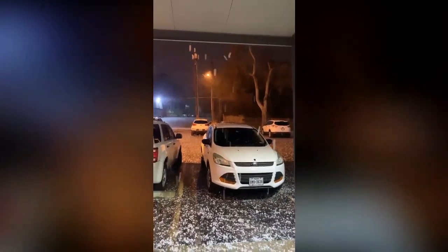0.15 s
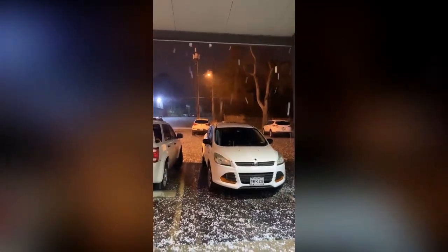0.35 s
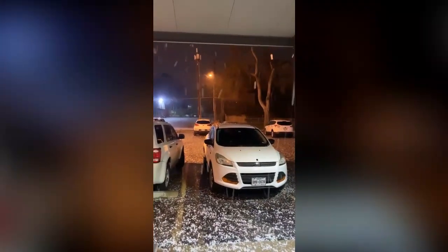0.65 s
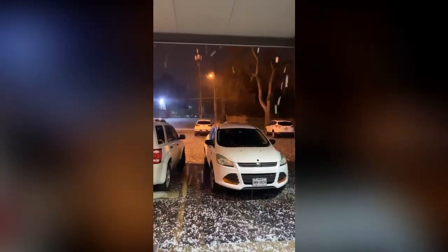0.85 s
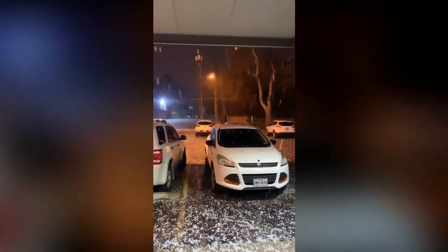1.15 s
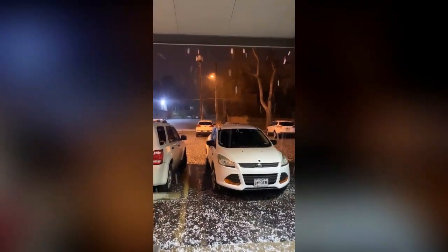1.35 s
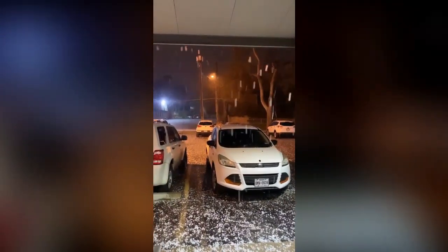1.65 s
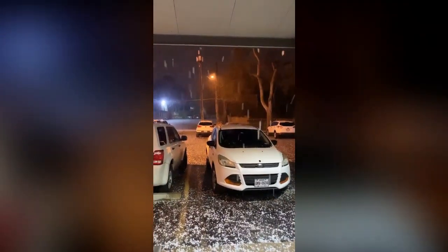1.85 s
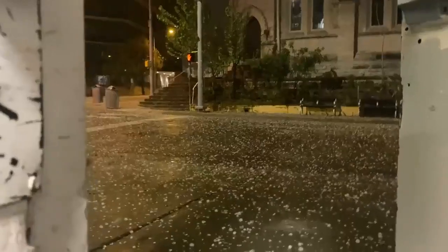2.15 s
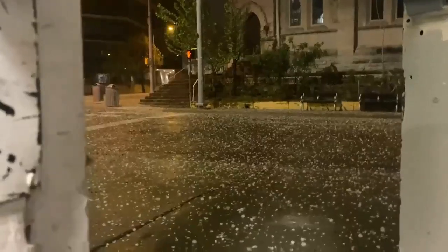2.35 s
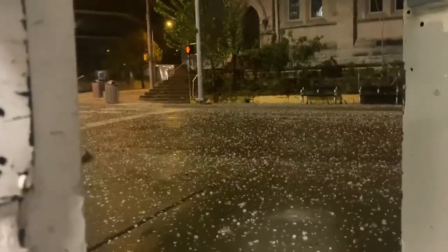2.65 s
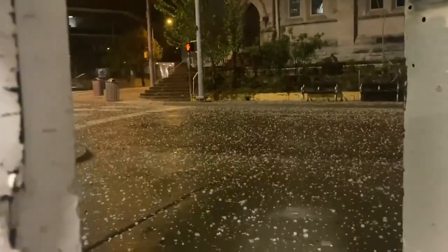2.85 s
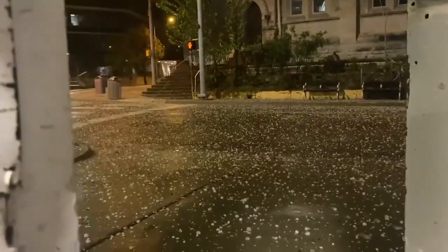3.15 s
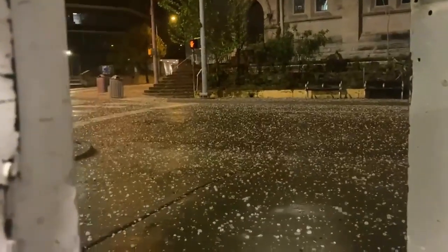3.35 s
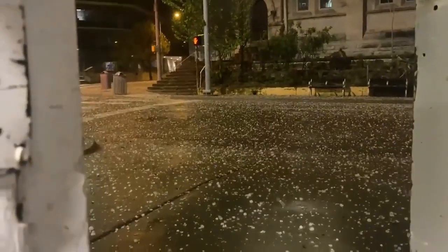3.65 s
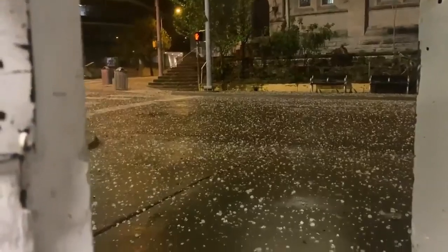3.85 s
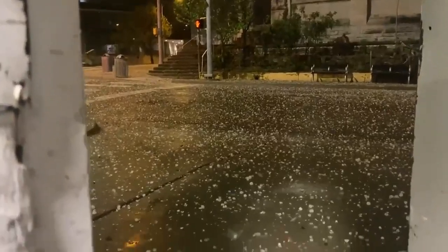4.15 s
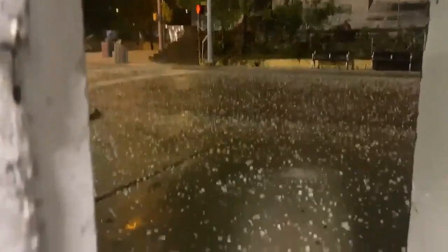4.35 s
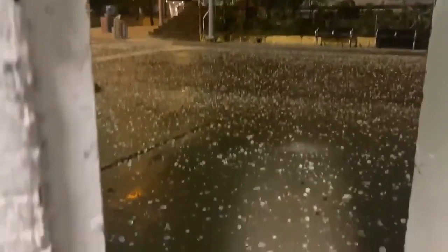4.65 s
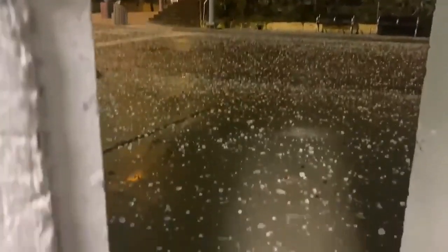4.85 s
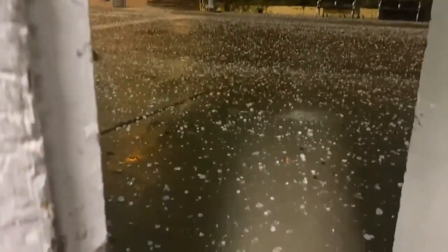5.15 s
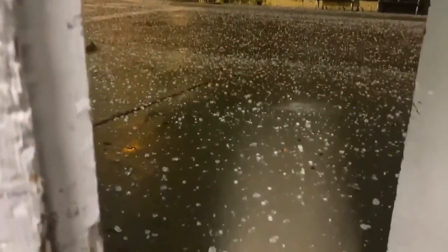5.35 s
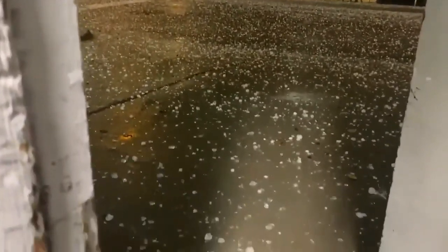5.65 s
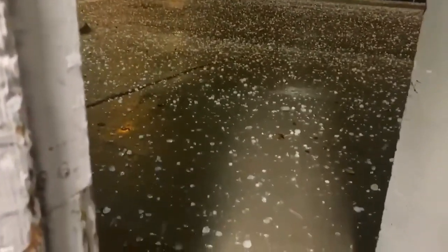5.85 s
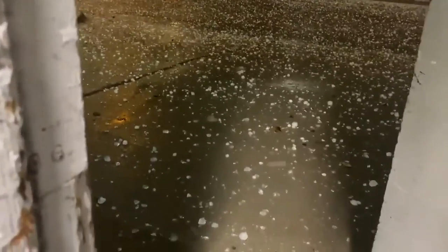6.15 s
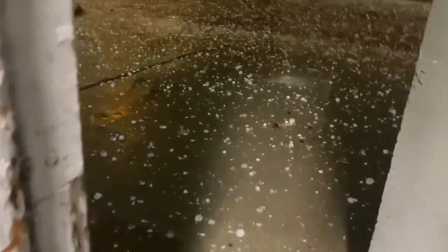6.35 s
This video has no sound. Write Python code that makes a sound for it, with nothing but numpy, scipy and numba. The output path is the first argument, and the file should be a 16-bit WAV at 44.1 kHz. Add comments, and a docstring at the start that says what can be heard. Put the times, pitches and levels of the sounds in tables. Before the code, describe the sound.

A hailstorm in two places. First, from under a car park awning, dense dull mono clatter with metallic rattles, hard knocks and low thuds on car bodies. After about two seconds it stops dead for a moment. Then a paved street from a doorway bursts in, in stereo: a bright roar with loud, sharp ice cracks, continuing to the end.

```python
"""Heavy hail in two places

A car park heard in mono from under an awning, a short silence, then a paved street in stereo from a doorway.
Far stones merge into a roar of flickering noise bands; near ones crack singly as short damped sines.
Big stones thud on car roofs and paving as ringing modes, among heavy knocks and brief hollow tones.
On the street the loudest stones push the limiter down, and the roar swells back between them.
"""
import sys
import numpy as np
from scipy import signal
from scipy.fft import rfft, irfft, next_fast_len
from scipy.io import wavfile
from scipy.ndimage import uniform_filter1d
from numba import njit

SR = 44100
rng = np.random.default_rng(int(sys.argv[2]) if len(sys.argv) > 2 else 0)


def digitize_waveform(pressure):
    """Quantize a signal to 16-bit integers and store it at the path in sys.argv[1].

    Rows of a 2-D input are taken as channels; values are limited to [-1, 1].
    """
    field = np.atleast_2d(pressure).T
    bounded = np.clip(field, -1, 1)
    quanta = np.round(bounded * 32767).astype(np.int16)
    wavfile.write(sys.argv[1], SR, quanta)


N = 286650
FREQ = np.fft.rfftfreq(next_fast_len(N), 1 / SR)

PARK_END_S, STREET_START_S = 1.947, 2.104
STREET_GAIN_DB = -3  # applied to everything heard on the street
PORT_LAG_S = 0.000296  # the street lies along the line of the two ports and reaches the right one first
BIGGEST_SHARE = 0.06  # levels off the size of the largest stones
GUST_PER_S, GUST_DB, RUMBLE_GUST_DB = 12, 0.54, 1.0  # how fast and how far the levels wander
RING_BLUR = 0.8  # noisy part of a hollow ring against its steady part
LIMIT, LIMIT_RELEASE_S = 1.18, 0.19
CLIP_AT = 0.92  # hard ceiling after the limiter
TOP_HZ, STREET_TOP_HZ = 15750, 15480


def amp(db):
    """Amplitude factor of a level in dB."""
    return 10 ** (np.asarray(db) / 20)


def unit(x):
    """Scale x to an RMS of 1."""
    return x / np.sqrt(np.mean(x ** 2))


def along(table):
    """Values of (frequency [Hz], value) rows at every frequency, joined on a log axis."""
    hz, value = np.transpose(table)
    return np.interp(np.log(FREQ + 1), np.log(hz), value)


def colour(x, gain):
    """Weigh every frequency of x by gain."""
    size = next_fast_len(N)
    return irfft(rfft(x, size) * gain, size)[..., :N]


def walk(rate):
    """Random levels, rate of them a second, joined by straight ramps; RMS 1."""
    hold = int(SR / rate)
    steps = np.repeat(rng.standard_normal(N // hold + 1), hold)
    return unit(uniform_filter1d(steps, hold)[:N])


@njit
def add(out, start, hz, cycles, size):
    """Damped grains: a sine that dies by 1 / e in the given number of cycles."""
    for k in range(len(hz)):
        turn = np.exp((2j * np.pi - 1 / cycles) * hz[k] / SR)
        for c in range(2):
            z = size[k, c] + 0j
            stop = min(start[k, c] + int(6 * cycles * SR / hz[k]), out.shape[1])
            for i in range(start[k, c], stop):
                out[c, i] += z.imag
                z *= turn


def cracks(s, size, hz, pan_db, cycles, lag_per_db=1.0):
    """One short grain a stone; the nearer port hears it louder and a few samples earlier."""
    out = np.zeros((2, N))
    half_pan_db = pan_db[:, None] * np.array([1, -1]) / 2
    start = (s[:, None] * SR - lag_per_db * half_pan_db).astype(int)  # lag in samples per dB
    add(out, np.clip(start, 0, N), hz, cycles, size[:, None] * amp(half_pan_db))
    return out


def lagged(x):
    """Sound from along the street: early at the right port, late at the left."""
    return colour(x, np.exp(np.outer([-1j, 1j], np.pi * FREQ * PORT_LAG_S)))


def doorway_noise():
    """Three arrivals of noise, constant in total power: facing both ports, along the street, and scattered."""
    # Direction of the street's roar, levels above the scattered part:
    # (frequency [Hz], facing level [dB], along-street level [dB])
    arrivals = [(60, 19, -7), (200, 6, 2), (506, -0.5, -10), (1210, -1.5, -3.5), (2460, -1, -41),
                (4640, 8, -32), (6460, 1, -3), (8400, -9, 16), (12000, -14, 20), (15500, -12, -5)]
    hz, facing_db, street_db = np.transpose(arrivals)
    facing = amp(along(np.transpose([hz, facing_db])))
    lengthwise = amp(along(np.transpose([hz, street_db])))
    total = np.sqrt(1 + facing ** 2 + lengthwise ** 2)
    ahead, down, left, right = rng.standard_normal((4, N))
    from_ahead = colour(ahead, facing / total)
    from_street = lagged(colour(down, lengthwise / total))
    scattered = colour(np.array([left, right]), 1 / total)
    return from_ahead + from_street + scattered


def roar(spectrum, noise, flicker_db):
    """Countless far stones: octave bands of noise, each flickering on its own around a shared flicker."""
    out, shared = 0, walk(40)
    for hz in 40 * 2. ** np.arange(9):
        octaves_off = np.clip(np.log2((FREQ + 1) / hz), -1, hz < 9000)  # the top band stays open above
        band = np.cos(np.pi / 2 * octaves_off) ** 2
        flicker = amp(flicker_db * (shared + 0.7 * walk(25.1)))
        out = out + flicker * colour(noise, band * amp(along(spectrum)))
    return unit(out)


def thuds(modes, per_s, spread_db, detune_share=0.051):
    """Big stones ring the given modes, each blow with its own share of every mode."""
    count, out = int(per_s * N / SR), np.zeros((2, N))
    when, big = rng.random((count, 2)).T
    start = np.repeat((when * N).astype(int)[:, None], 2, axis=1)
    for hz, width_hz, db in modes:
        share, detune = rng.standard_normal((count, 2)).T
        size = amp(db - spread_db * np.log(big + 0.043)) * share * np.sqrt(width_hz)
        cycles = hz / (np.pi * width_hz)  # a narrow mode rings longer
        add(out, start, hz * (1 + detune_share * detune), cycles, np.repeat(size[:, None], 2, axis=1))
    return unit(out)


def near_patter(spectrum, per_s, spread_db, width_db, cycles, low_hz=700, octaves=4.14):
    """Near stones at random moments, many small and few large, each with its own pitch and side."""
    count = int(per_s * N / SR)
    when, big, pitch, side, sign = rng.random((count, 5)).T
    hz = np.minimum(low_hz * 2 ** (octaves * pitch), 15000)
    size = np.sign(sign - 0.5) * amp(-spread_db * np.log(big + BIGGEST_SHARE)) * hz / 1000
    grains = cracks(when * N / SR, size, hz, width_db * (2 * side - 1), cycles)
    return unit(colour(grains, amp(along(spectrum))))


def steady(storm, clatter_curve, rumble_curve):
    """Clatter and rumble, parted near 300 Hz, each follow their level and wander a little around it."""
    rumble = colour(storm, 1 / (1 + (FREQ / 300) ** 4))
    clatter = storm - rumble
    t = np.arange(N) / SR
    clatter_db = np.interp(t, *np.transpose(clatter_curve)) + GUST_DB * walk(GUST_PER_S)
    rumble_db = np.interp(t, *np.transpose(rumble_curve)) + RUMBLE_GUST_DB * walk(GUST_PER_S)
    return amp(clatter_db) * unit(clatter) + amp(rumble_db) * unit(rumble)


def rings():
    """Short hollow tones blurred into a narrow band, rising quickly and fading more slowly."""
    # Hollow rings that swell, slide and stop:
    # (time [s], length [s], level [dB], start pitch [Hz], end pitch [Hz])
    hollow_tones = [(.198, 0.052, -17.5, 285, 275), (0.206, 0.058, -19.5, 616, 600),
                    (0.236, 0.07, -18, 382, 370), (0.442, 0.024, -19, 416, 400),
                    (3.345, 0.072, -17, 558, 447), (3.35, .06, -23, 900, 950),
                    (4.129, .13, -19.5, 701, 700), (4.129, 0.12, -21, 429.5, 419),
                    (4.19, 0.049, -14, 140, 140), (4.72, .04, -16.5, 196, 200),
                    (4.749, 0.088, -20.5, 739, 520), (4.761, 0.087, -24, 380, 370),
                    (4.815, 0.03, -14.5, 185, 180), (4.91, .035, -15, 190, 185),
                    (5.441, 0.09, -27, 402, 401)]
    out = np.zeros((2, N))
    for start_s, length_s, level_db, from_hz, to_hz in hollow_tones:
        i, share = int(start_s * SR), np.linspace(0, 1, int(length_s * SR))
        phase = 2 * np.pi * np.cumsum(from_hz + (to_hz - from_hz) * share) / SR
        swell = amp(level_db) * np.sin(np.pi * share ** 0.78)
        out[:, i:i + len(share)] += swell * np.array([np.sin(phase), np.cos(phase)])
    # random gains on the sine and cosine parts spread each tone around its pitch
    return out[0] * (1 + RING_BLUR * walk(110)) + out[1] * RING_BLUR * walk(110)


def heavy_knocks():
    """Heaviest blows: a damped sine of a few cycles, with two overtones off the harmonic series."""
    # Heaviest knocks: (time [s], level [dB], pitch [Hz])
    blows = [(0.057, -10, 890), (0.436, -7, 840), (0.556, -8, 860), (0.621, -11, 670), (0.165, -8, 1450),
             (0.262, -6, 1330), (0.314, -5, 1400), (0.493, -6, 1590), (0.564, -5, 1640), (0.678, -12, 1480),
             (0.782, -10, 586), (0.849, -10, 1060), (1.057, -3, 1730), (1.108, -10, 1210),
             (1.309, -4, 1440), (1.365, -4, 1800), (1.59, -8, 1430), (1.627, -9, 1190), (1.85, -11, 1550),
             (1.879, -10, 1240), (0.92, -8, 961), (1.183, -11, 347), (1.351, -4.5, 600), (1.394, -10, 239),
             (1.729, -8, 723), (3.149, -2, 714), (3.345, -10, 420), (3.795, -16, 666), (4.215, -16, 523),
             (4.252, -10, 438), (4.76, -11, 400), (4.8, -6, 990), (5.437, -9, 732), (5.548, -10, 552),
             (5.643, -9, 436), (5.975, -16, 670), (6.056, -8, 700), (6.246, -9, 376), (6.297, -6, 760)]
    # Overtones that ring with every knock: (multiple of its pitch [ratio], level [dB])
    overtones = [(1.42, -7), (2.07, -10)]
    when, level_db, hz = np.transpose(blows)
    out = cracks(when, amp(level_db), hz, 0 * when, cycles=3.1)
    for multiple, db in overtones:
        out = out + cracks(when, amp(level_db + db), multiple * hz, 0 * when, cycles=5.0)
    return out


def stones(table, cycles, tick_db, spray_db, spray_s):
    """A loud stone: a crack at its own pitch, a bright tick, and a brief spray of splinters."""
    when, level_db, hz, *pan = np.transpose(table)
    pan_db = pan[0] if pan else 0 * when
    # make up for the damping, and set the level at the nearer port
    size = amp(level_db - np.abs(pan_db) / 2) * np.exp(1 / (4 * cycles))
    push = np.sign(rng.random(len(size)) - 0.8) * size  # most arrive as a drop in pressure
    tick = cracks(when, push * amp(tick_db), np.minimum(3 * hz, 14000), pan_db, cycles)

    blows = np.zeros(N)
    blows[((when + 1 / hz) * SR).astype(int)] = size  # splinters fly once the first cycle is over
    fade = signal.lfilter([1], [1, -np.exp(-1 / (spray_s * SR))], blows)
    splinters = colour(rng.standard_normal(N), FREQ / (FREQ + 1500) / (1 + (FREQ / 5000) ** 2))
    spray = amp(spray_db) * fade * unit(splinters)

    # a weak swing the other way comes first
    lead = cracks(when - 0.5 / hz, -amp(-14.0) * push, hz, pan_db, cycles)
    return lead + cracks(when, push, hz, pan_db, cycles) + tick + spray


def level_dips():
    """Gain curve of the car park, whose level dips for a few milliseconds at a time."""
    # Brief dips in level: (time [s], depth [dB])
    dips = [(.25, -5), (.367, -3), (.617, -1.5), (.868, -6), (.99, -3), (1.115, -2), (1.383, -2.5),
            (1.413, -1.5), (1.585, -1.5)]
    t, dip_s = np.arange(N) / SR, 0.005
    return amp(sum(db * np.exp(-((t - s) / dip_s) ** 2) for s, db in dips))


def car_park():
    """Denser, duller clatter on car bodies, in mono, with the top turned down."""
    # Colour of the roar, then of a near stone's crack: (frequency [Hz], level [dB per Hz])
    roar_colour = [(40, -16), (135, -9.5), (160, -9.5), (285, -4.5), (520, -4.5), (950, -6), (1250, -4.5),
                   (1650, -3.5), (2550, -7), (2850, -13), (3250, -10), (3900, -8), (4940, -14), (8560, -14),
                   (11900, -18)]
    crack_colour = [(300, -12), (1200, 0), (2400, -6.5), (4000, -15), (8000, -12), (12000, -12.5),
                    (15000, -29)]
    # Hollows that big stones thud on, then a car panel that big stones also ring: # (frequency [Hz], width
    # [Hz], level [dB])
    thud_modes = [(90, 24, -6.5), (131.4, 8.5, -3), (255, 41, -2.5), (322, 92, 0), (686, 210, -5),
                  (1215, 35, -4.5)]
    panel_modes = [(1200, 35, -3), (1370, 60, -1), (1560, 60, -1.5), (2410, 60, -3.5), (3050, 40, -9),
                   (3880, 120, -7), (5760, 120, -11)]
    # Loudest single stones: (time [s], level [dB], pitch [Hz])
    loud_stones = [(0.0612, -1.5, 2710), (0.0664, -5, 2030), (0.1048, 0, 2330), (0.1252, -7, 2230),
                   (0.1312, -10, 2060), (0.2011, -11, 1360), (0.3321, -2, 2020), (0.3624, -4, 1980),
                   (0.3918, -5, 1790), (0.463, -11, 2100), (0.6358, -4, 2110), (0.6796, -8, 2140),
                   (0.7012, -9, 1990), (0.7282, -5, 2420), (0.7334, -10, 3060), (0.7733, -10, 1690),
                   (0.8499, -5, 2290), (0.8828, -6, 1950), (0.9208, -3, 2320), (0.9652, -5, 1800),
                   (0.972, -5, 2090), (0.9779, -3, 2070), (1.0208, -5, 2200), (1.0605, -5, 1850),
                   (1.2095, -10, 2290), (1.2428, 1, 2650), (1.252, -7, 2030), (1.2869, 1.5, 1920),
                   (1.3686, -4, 1610), (1.427, 1.5, 2410), (1.5785, -3, 1640), (1.5993, -4, 1760),
                   (1.6802, 0, 2450), (1.7352, -4, 1710), (1.744, -4, 2350), (1.772, -3, 1940),
                   (1.827, -10, 2220), (1.8529, -5.5, 1750), (1.8577, -11, 2220), (1.8798, -6, 1900),
                   (1.9392, -8.5, 2770)]
    # Clatter above 300 Hz, then rumble below: (time [s], level [dB])
    clatter_curve = [(0, -12.5), (1.0, -12), (1.945, -12)]
    rumble_curve = [(0, -28), (.25, -25), (.5, -26), (.75, -24.5), (1.0, -23), (1.3, -24), (1.6, -25.5),
                    (1.945, -26.5)]

    far = roar(roar_colour, rng.standard_normal(N), flicker_db=1.6)
    near = near_patter(crack_colour, per_s=1500, spread_db=5.5, width_db=0, cycles=0.93)
    # sheet metal rings on
    rattle = near_patter(crack_colour, per_s=800, spread_db=3.0, width_db=0, cycles=18.4,
                         low_hz=352.5, octaves=3.2)
    low = thuds(thud_modes, per_s=200, spread_db=1.5)
    panel = thuds(panel_modes, per_s=250, spread_db=2.5, detune_share=0.011)
    storm = amp(-1.0) * far + amp(-7.0) * near + amp(-4.5) * rattle + amp(-14.0) * low + amp(-11.5) * panel
    loud = stones(loud_stones, 0.7, tick_db=-6, spray_db=-12.0, spray_s=0.0047)
    mic_db = -12 / (1 + (12600 / (FREQ + 1)) ** 30)  # steep shelf down above 12.6 kHz
    return colour(steady(storm, clatter_curve, rumble_curve) + loud, amp(mic_db))


def street():
    """Brighter, sparser cracks on paving, spread across the doorway."""
    # Colour of the roar, then of a near stone's crack: (frequency [Hz], level [dB per Hz])
    roar_colour = [(25, -30), (45, -10), (75, -4), (164, -4), (770, -3), (1110, -5.5), (2000, -6),
                   (3800, -9.5), (7310, -14), (10300, -14), (13700, -19), (15400, -25.5)]
    crack_colour = [(300, -6), (1000, 2.5), (2000, -8), (4000, 5), (6000, -2), (10000, -5), (15000, 7)]
    # Panels and hollows that big stones thud on: (frequency [Hz], width [Hz], level [dB])
    thud_modes = [(91.5, 29, -4), (131, 100, -2), (173, 31, 0.5), (231, 34, -6), (507, 41, -2),
                  (729, 52, -4.5)]
    # Loudest single stones: (time [s], level [dB], pitch [Hz], left minus right [dB])
    loud_stones = [(2.116, 0.5, 3430, -4.5), (2.1227, -3, 3190, -1), (2.1318, -2.5, 3580, -7),
                   (2.142, -3, 3990, 1), (2.169, 2, 3150, 3), (2.1888, 2, 4680, 0), (2.196, 10.5, 3940, -6),
                   (2.2435, 2, 4770, 0), (2.3005, 9, 3888, -0.5), (2.3439, 1, 3110, -1),
                   (2.3491, 6.5, 3480, 4), (2.4113, 5, 4610, 3), (2.4225, 2, 4250, 0), (2.4738, 6, 4620, 2),
                   (2.5033, 9, 4220, 0.5), (2.5337, 0, 3046, -2.5), (2.5595, 3, 4120, -0.4),
                   (2.5907, 8, 3340, 6.5), (2.651, 4, 3480, 6), (2.6619, 3, 3360, 3), (2.6799, 0, 3000, 3),
                   (2.6947, 5, 4960, 0.5), (2.7212, 8, 5090, 8), (2.7365, 7.5, 4130, 7),
                   (2.7657, 4, 3580, 5), (2.8165, 3, 3720, 1), (2.8502, 3, 4420, 3), (2.8656, 8.5, 4120, 6),
                   (2.9113, 4, 4460, 3), (2.9212, 7, 3740, 8), (2.9472, 5, 4060, 0), (2.9551, 8, 4630, -3),
                   (3.0023, 5, 5060, -1), (3.0785, 5.5, 4090, 3.7), (3.0959, 5.4, 4320, -0.2),
                   (3.1062, 8, 3220, 5), (3.1509, 2, 3470, -1), (3.1611, 2, 3970, 3),
                   (3.1914, 6.5, 3700, 7), (3.2181, 0, 3060, 1.5), (3.2231, 2, 4670, 3),
                   (3.2562, 9.5, 3930, 6), (3.2659, 9, 4200, 2.8), (3.3429, 5, 2490, 3.0),
                   (3.3831, 7, 4700, 0), (3.3938, -1, 4050, 3), (3.4125, 10.5, 5540, 5), (3.43, 9, 3620, 7),
                   (3.4541, 5.5, 3340, 8), (3.4728, 4, 4630, 6), (3.4867, 2, 4580, 2.1),
                   (3.4926, 7.5, 4140, 7), (3.5017, 6, 4110, -0.3), (3.5215, 6, 4470, 1),
                   (3.5351, 3, 3820, -1.1), (3.6305, 7.6, 3970, 6), (3.6903, 1, 2720, 4),
                   (3.7072, 4, 4050, 8), (3.727, 7, 5150, 4.5), (3.8527, -2, 2140, -6),
                   (3.8568, 1, 2450, 2), (3.8995, 5, 3500, 1), (3.9737, 4.5, 4040, 2),
                   (4.0168, 3.5, 5100, 8.5), (4.0274, 3, 5000, 5), (4.1255, 0, 3810, 2),
                   (4.1802, -3, 4280, -4), (4.1897, 2, 3750, 5.4), (4.1979, 0, 3710, 8),
                   (4.206, 1, 3180, 1), (4.2364, 0, 2880, 1), (4.2408, 5.5, 2740, 4),
                   (4.2638, 4, 3800, 2.0), (4.2892, 10.5, 4350, 0), (4.3197, 7.5, 3580, -2),
                   (4.3416, 6, 4100, -1.2), (4.3522, 5, 4260, 1), (4.3642, 3, 4750, -2),
                   (4.3768, 6, 2810, 5), (4.4442, 7, 3530, 0), (4.4522, 4.0, 3630, 1.4),
                   (4.458, 9, 3380, 3.5), (4.4778, 7, 3970, 2.4), (4.4894, 7, 3490, 6),
                   (4.5088, 3, 3640, 4.9), (4.5658, 5, 4300, 4), (4.5745, 3, 3290, 2.5),
                   (4.6368, 3, 5370, 0), (4.6431, 5, 2900, 3.5), (4.6502, 9.5, 3550, 1),
                   (4.7071, 5, 3190, 5), (4.8404, 5, 3610, 3), (4.8452, 8.5, 3250, 2.5),
                   (4.8645, 8, 3850, 3.4), (4.9086, 8.5, 5000, 2.5), (4.9675, 4, 3640, 9),
                   (4.9783, 4, 4430, 8.5), (5.0307, 4, 3950, 2), (5.0404, 1, 3680, 3), (5.0476, 4, 4620, 6),
                   (5.0531, 2, 5330, 5), (5.0882, 1, 3450, -4), (5.1474, 1, 6670, -4), (5.1521, 6, 2950, 3),
                   (5.1732, 4, 4520, 4), (5.1893, 2.5, 3140, -1), (5.2019, 8.5, 3580, 4.5),
                   (5.2447, 0, 3980, 5), (5.2585, 2, 5500, -0.6), (5.2734, 5, 4450, 7.1),
                   (5.2849, 3, 5910, 3), (5.2963, 6.5, 2910, 5.5), (5.4001, 6, 6630, -0.5),
                   (5.4315, 5, 4500, 4), (5.4596, 7, 3880, 3.5), (5.4859, 2, 6010, -1),
                   (5.4921, 4, 4680, 7), (5.6005, 3, 5500, 5), (5.607, 7.5, 3070, 5),
                   (5.6445, 5.5, 4040, 4), (5.658, 6.5, 4390, 0.5), (5.6682, 4, 4830, -0.1),
                   (5.7044, 2, 3450, 5), (5.7632, 7.5, 3660, 5), (5.7755, 8.5, 4830, -1),
                   (5.8159, 8, 3200, 1.5), (5.8481, 1, 5660, 4), (5.9157, 1, 4150, -1.1),
                   (5.9275, 4, 6500, 3), (5.9298, 6.5, 3530, 3), (5.9375, 1, 4800, 3), (5.9445, 6, 5140, 6),
                   (5.9582, 7.5, 3660, 2), (5.9899, 9, 3550, 7), (6.043, 5, 2700, 2.5),
                   (6.0751, 1, 3670, 2), (6.1291, 3, 3860, 4), (6.1331, 7, 4120, 3), (6.1582, 0, 6460, 7),
                   (6.1965, 7, 5460, 2), (6.2313, 5.5, 4170, 3), (6.265, 3, 3810, 3), (6.2788, 1, 4480, 4),
                   (6.3308, 11, 4760, 1.5), (6.3383, 5, 4630, 1), (6.3788, 2, 3150, 3),
                   (6.3952, 4, 5830, 0), (6.3991, 3, 4580, 6), (6.4275, 2, 5000, 2),
                   (6.4675, 6.5, 3950, 4.8), (6.4804, 9.5, 3470, 9.2)]
    # Clatter above 300 Hz, then rumble below, ahead of the street gain: (time [s], level [dB])
    clatter_curve = [(2.105, -7.5), (2.19, -9.5), (2.3, -10), (2.45, -10), (2.7, -10), (3.1, -10),
                     (3.25, -10), (3.45, -9), (3.75, -10), (3.87, -9.5), (4.0, -9.5), (4.1, -10.5),
                     (4.25, -9.5), (4.4, -9.5), (4.6, -10.5), (5.0, -10), (5.15, -10.5), (5.25, -10.5),
                     (5.35, -10), (5.5, -10.5), (5.7, -10.5), (5.88, -10.5), (5.925, -10), (5.975, -7.5),
                     (6.0, -10.5), (6.15, -10), (6.3, -9.5), (6.5, -9)]
    rumble_curve = [(2.105, -15.5), (2.5, -20.5), (2.8, -20), (3.0, -19.5), (3.13, -16), (3.25, -22),
                    (3.35, -16.5), (3.8, -18), (3.93, -17), (4.05, -18), (4.2, -18), (4.3, -16),
                    (4.55, -17.5), (5.05, -21.5), (5.27, -18), (5.48, -16), (5.65, -19.5), (6.1, -18),
                    (6.5, -18.5)]
    # Stereo balance: (frequency [Hz], left minus right [dB])
    balance = [(60, -3.5), (110, 0.5), (200, -4.5), (380, -3), (700, -2.5), (1290, -1.5), (2380, 0),
               (4400, 2), (8120, 0), (15000, -0.5)]

    far = roar(roar_colour, doorway_noise(), flicker_db=1.07)
    near = lagged(near_patter(crack_colour, per_s=1300, spread_db=3.5, width_db=4.5, cycles=1.2, octaves=3.786))
    # ice rings as it bounces
    rattle = near_patter(crack_colour, per_s=500, spread_db=2.0, width_db=10.5, cycles=9.8,
                         low_hz=598, octaves=3.4)
    low = thuds(thud_modes, per_s=200, spread_db=1.5)
    storm = amp(2.16) * far + amp(-2.5) * near + amp(-8.0) * rattle + amp(-5.5) * low
    loud = stones(loud_stones, 0.6, tick_db=-7.0, spray_db=-14.5, spray_s=0.0022)
    mic_db = -16 * (FREQ > STREET_TOP_HZ) - 12 / (1 + (FREQ / 45) ** 4)  # duller at both ends
    side_db = np.outer([0.5, -0.5], along(balance))
    return colour(steady(storm, clatter_curve, rumble_curve) + loud, amp(mic_db + side_db))


def scene():
    """The first place stops dead, the second starts as abruptly; knocks and hollow rings sound in both."""
    t = np.arange(N) / SR
    park_gate = np.clip((PARK_END_S - t) / 0.0005, 0, 1)
    street_gate = np.clip((t - STREET_START_S) / 0.0018, 0, 1)
    knocks = heavy_knocks() + rings()
    park = 0.88 * np.tanh((car_park() + knocks) / 0.85)  # soft saturation
    return park_gate * level_dips() * park + street_gate * amp(STREET_GAIN_DB) * (street() + knocks)


@njit
def duck(x, top, release_s, ahead):
    """Limiter: the gain drops at once to hold a coming peak at the top, then recovers slowly."""
    gain, peak, fall = np.empty(x.shape[1]), top, np.exp(-1 / (release_s * SR))
    for i in range(len(gain)):
        j = min(i + ahead, len(gain) - 1)
        peak = max(top + (peak - top) * fall, abs(x[0, j]), abs(x[1, j]))
        gain[i] = top / peak
    return gain


def record(dry):
    """The phone drops the deepest bass, ducks under loud hits, clips what is left and cuts the top."""
    dry = signal.sosfilt(signal.butter(2, 35, "high", fs=SR, output="sos"), dry)
    held = dry * duck(dry, LIMIT, LIMIT_RELEASE_S, 20)  # looks 20 samples ahead
    clipped = np.clip(held, -CLIP_AT, CLIP_AT)
    return signal.sosfilt(signal.ellip(12, 0.2, 90, TOP_HZ, fs=SR, output="sos"), clipped)


dry = scene()
out = record(dry)
digitize_waveform(out)
```